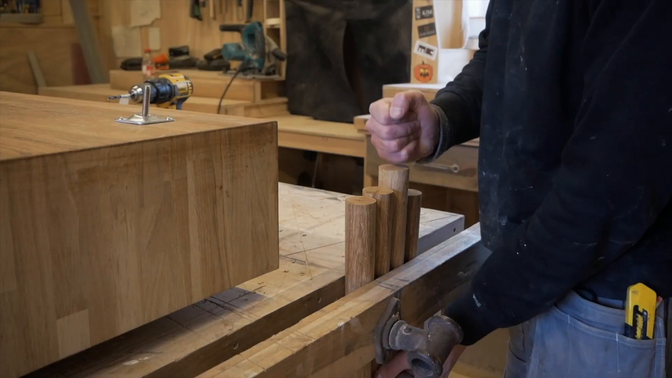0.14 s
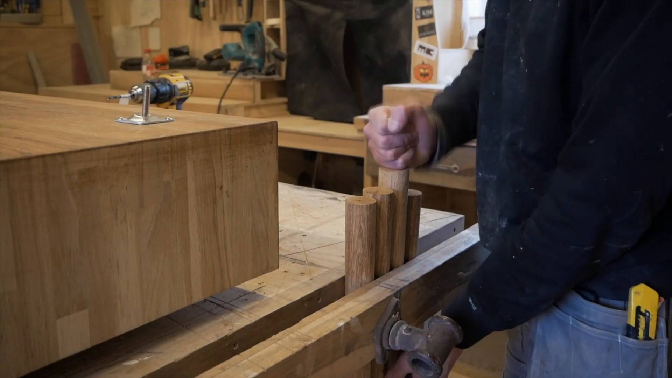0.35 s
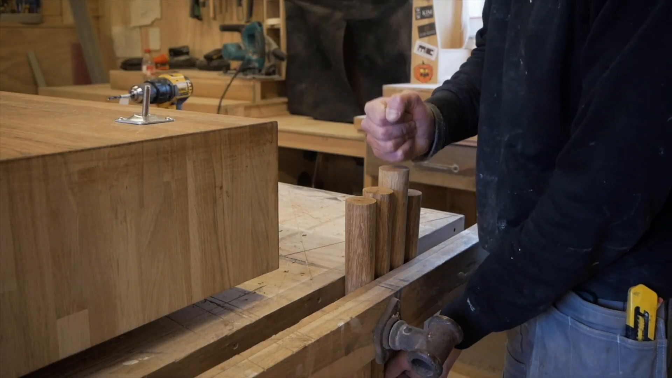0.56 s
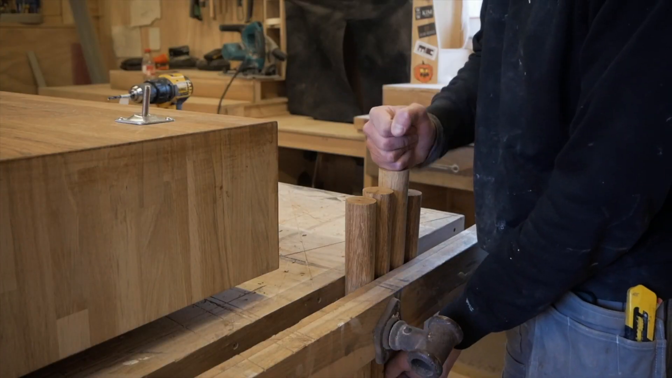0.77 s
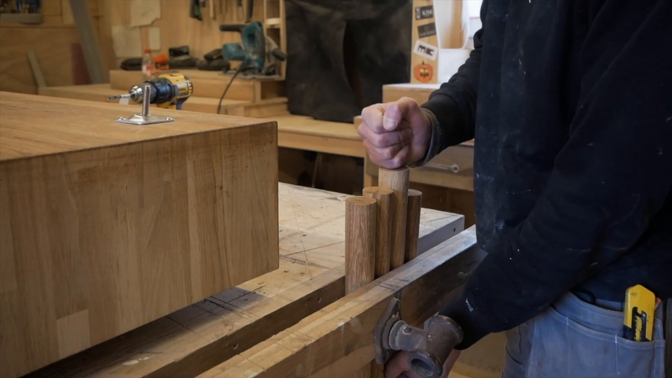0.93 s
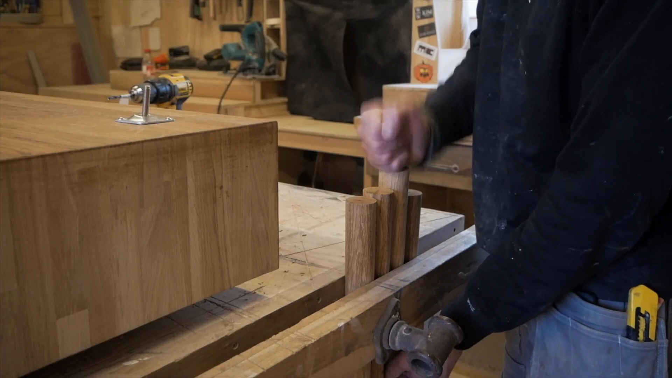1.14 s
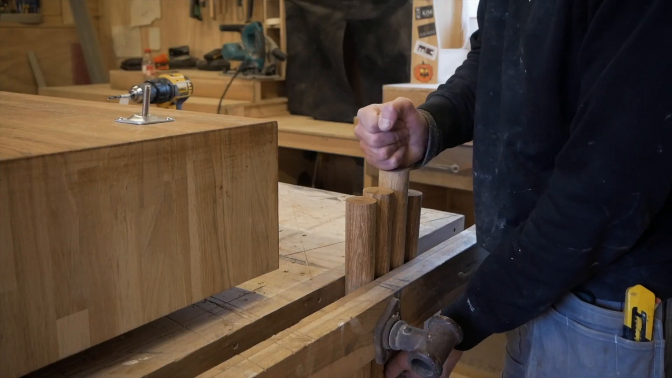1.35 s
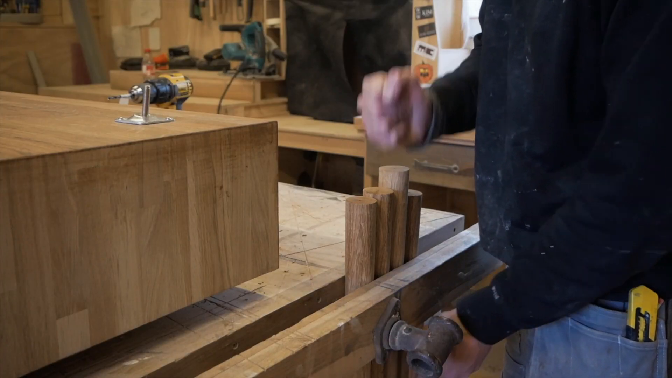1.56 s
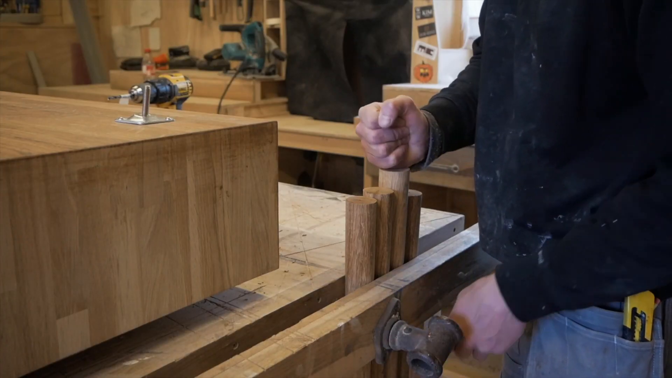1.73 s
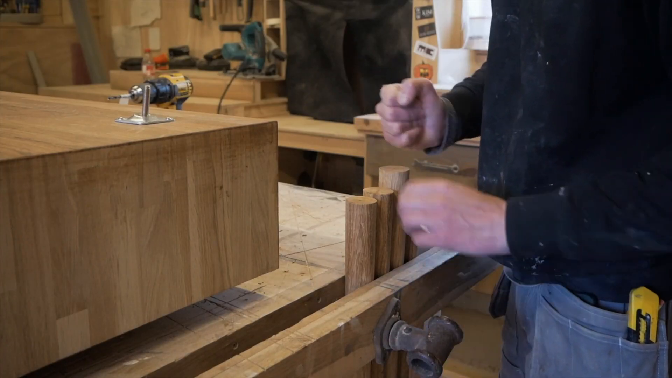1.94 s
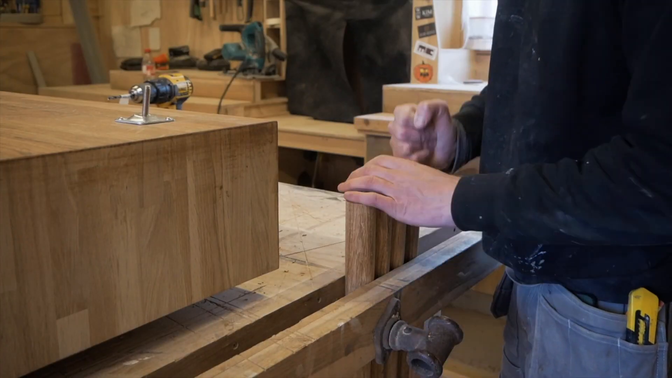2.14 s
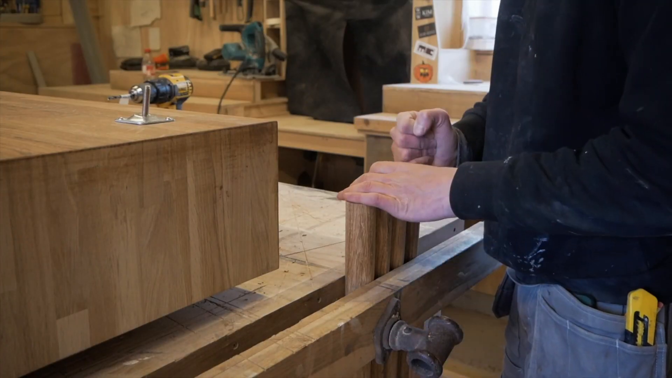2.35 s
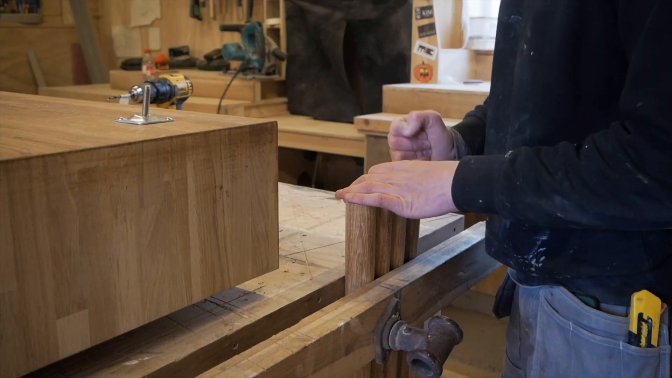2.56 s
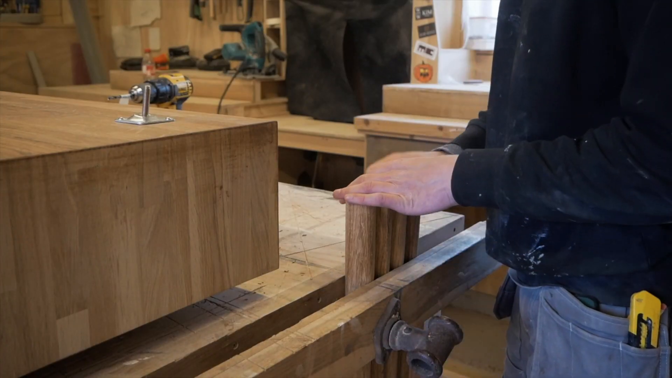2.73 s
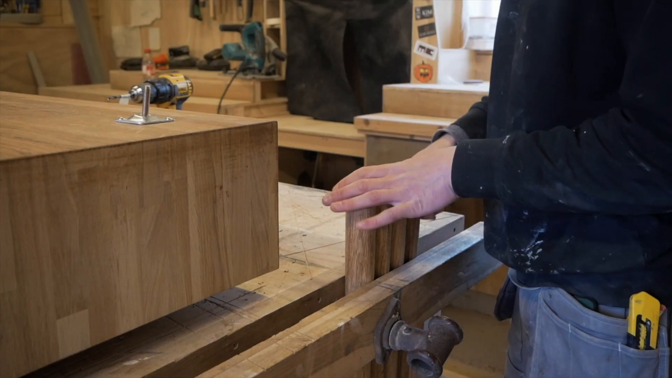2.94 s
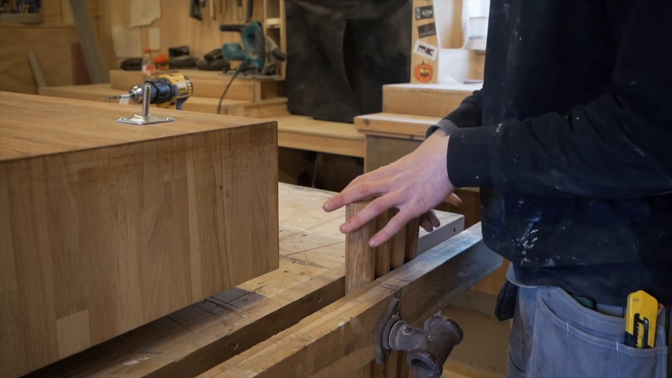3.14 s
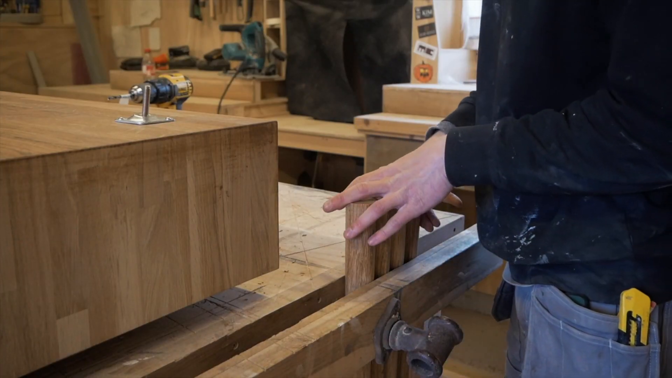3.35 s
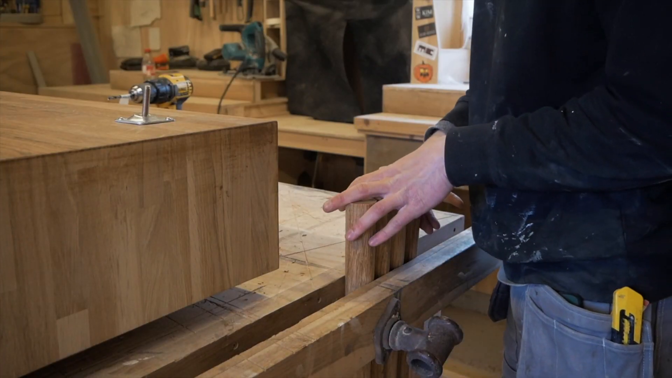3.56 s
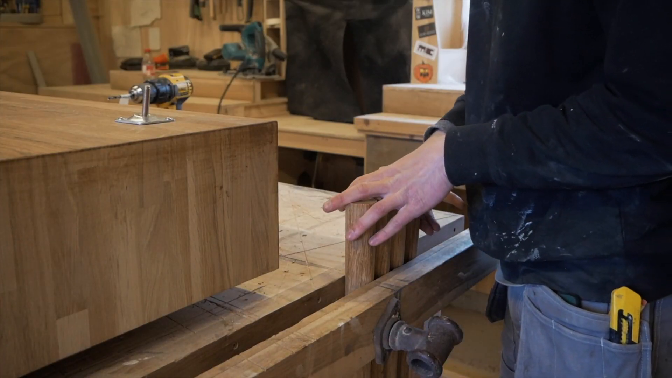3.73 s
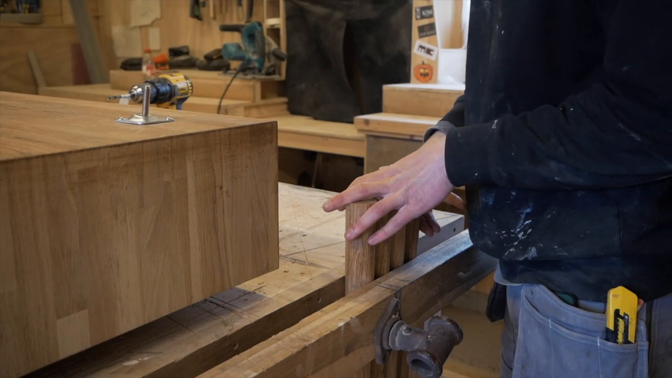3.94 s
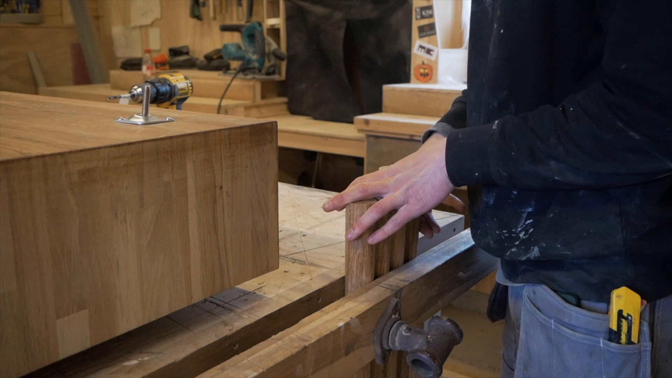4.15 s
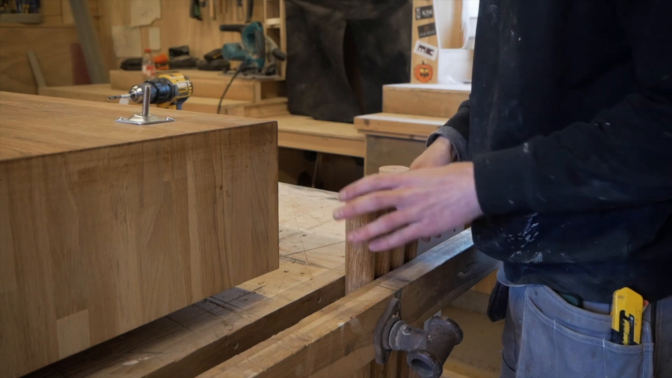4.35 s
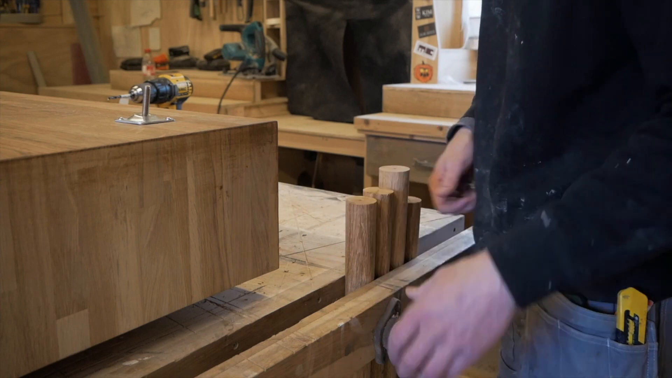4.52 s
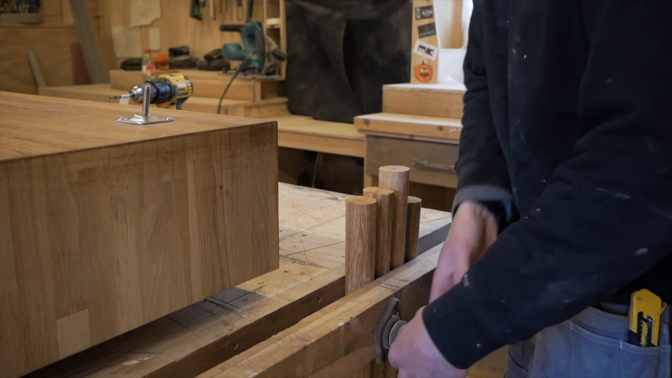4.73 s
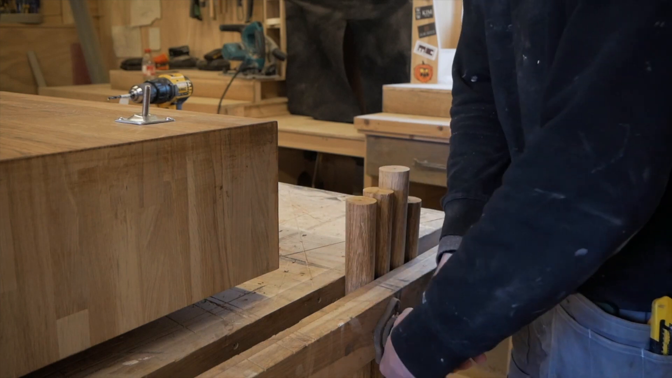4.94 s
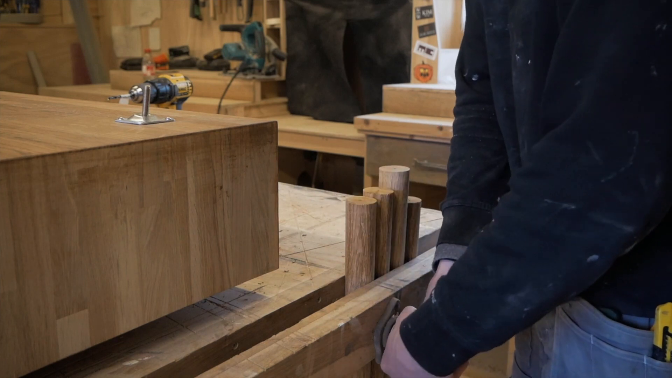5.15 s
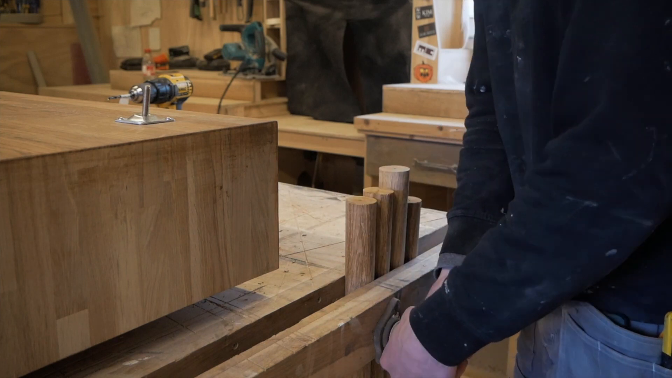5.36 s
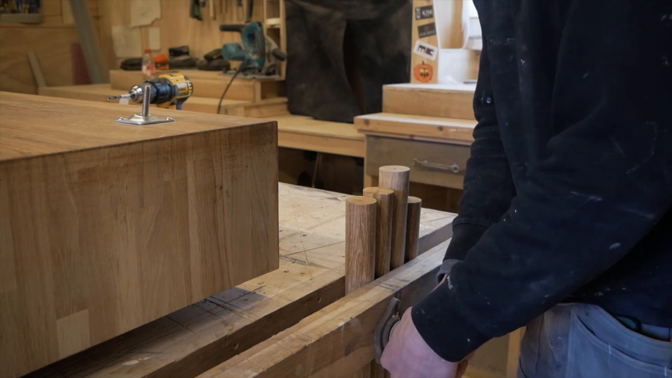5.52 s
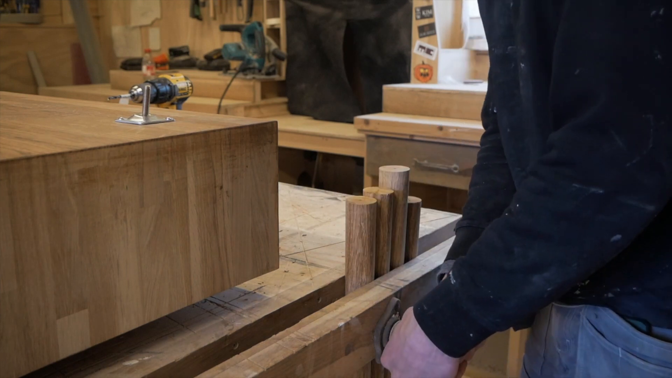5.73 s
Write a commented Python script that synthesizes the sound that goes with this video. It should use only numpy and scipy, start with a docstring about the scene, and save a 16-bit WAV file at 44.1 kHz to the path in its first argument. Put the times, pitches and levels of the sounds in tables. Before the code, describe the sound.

Five heavy, evenly spaced thumps on wood in a workshop, then two sharper knocks, light wooden taps and faint sleeve rustle.

```python
"""A workbench rings as a fist thumps on the tallest of some short wooden dowels clamped in its vise.
The fist drives the dowel down, then two knocks and a few light taps follow. Each impact thumps the bench,
excites the modes of the wood and lets it slip a little between the jaws; bench and workshop ring on.
In the pauses, faint friction: sleeves rustle, a hand settles on the dowels, the vise handle is worked."""
import sys
import numpy as np
from scipy import signal
from scipy.fft import rfft, irfft
from scipy.io import wavfile

SR = 44100
rng = np.random.default_rng(int(sys.argv[2]) if len(sys.argv) > 2 else 0)


def output_pcm(signal):
    """Save a mono or channel-first signal as 16-bit PCM at the path in sys.argv[1].

    Samples are clipped to [-1, 1] before scaling.
    """
    pcm = np.clip(np.atleast_2d(signal).T, -1, 1) * 32767
    wavfile.write(sys.argv[1], SR, np.round(pcm).astype(np.int16))


N = 255206
LEAD_IN = SR // 2   # samples before time zero, so an earlier blow can ring into the opening


def from_db(db):
    """Amplitude ratio for a level in decibels."""
    return 10 ** (np.asarray(db) / 20)


def at_hz(points, hz, column=1):
    """One column of a table, interpolated along log frequency."""
    table = np.array(points)
    return np.interp(np.log(np.maximum(hz, 1)), np.log(table[:, 0]), table[:, column])


def cut(x, hz, kind, order=2):
    """Butterworth filter."""
    return signal.sosfilt(signal.butter(order, hz, kind, fs=SR, output="sos"), x)


def resonance(x, hz, width_hz):
    """Damped oscillator: a two-pole resonance with unit gain at its peak."""
    radius = np.exp(-np.pi * width_hz / SR)
    feedforward = np.array([1, 0, -1]) * (1 - radius ** 2) / 2
    feedback = [1, -2 * radius * np.cos(2 * np.pi * hz / SR), radius ** 2]
    return signal.lfilter(feedforward, feedback, x + 1e-18)


def noise(spectrum):
    """Spectral shaping: white noise is coloured, then scaled to unit rms."""
    gain = from_db(at_hz(spectrum, np.fft.rfftfreq(N, 1 / SR)))
    coloured = irfft(rfft(rng.standard_normal(N)) * gain, N)
    return coloured / np.std(coloured)


def add(track, start_s, sound):
    """Superposition: a sound adds to the track from its start time."""
    start = LEAD_IN + round(start_s * SR)
    track[start:start + len(sound)] += sound[:len(track) - start]


# Still air of the room. Each row: frequency in Hz, relative spectral level in dB.
AIR_SPECTRUM = [(20, -23.5), (35, -8), (49, 4), (64, -18), (90, -14.5), (135, -16), (200, -15), (350, -17),
                (800, -19.5), (1600, -25.5), (3500, -31.5), (6000, -39.5), (13000, -40.5), (16000, -50)]

def room_air(level_db=-64):
    """Ambient noise: a steady floor, strongest in the bass."""
    return from_db(level_db) * noise(AIR_SPECTRUM)


# Diffuse field. Each row: frequency in Hz, level against the direct sound in dB, T60 in seconds.
ROOM_BANDS = [(50.5, -9, 0.26), (128.4, 9, .62), (252, 11.5, 0.48), (500, 9, 0.78), (992, 1, 0.66),
              (1810, 1.5, 0.65), (3600, -4.5, 0.56), (5895, -4, 0.49), (9830, -8, 0.33), (14860, -11, 0.24)]

def workshop(x, build_s=0.002, first_echo_s=0.003, early_db=-3, early_s=0.012):
    """Reverberation: reflections build up, strongest from the nearest walls, and decay band by band."""
    t, hz = np.arange(SR) / SR, np.fft.rfftfreq(SR, 1 / SR)
    white, tail = rfft(rng.standard_normal(SR)), np.zeros(SR)
    build = 1 - np.exp(-np.maximum(t - first_echo_s, 0) / build_s)
    early_lift = 1 + from_db(early_db) * np.exp(-t / early_s)
    edges = np.geomspace(230, 17000, 56) - 200
    for low, high in zip(edges, edges[1:]):
        centre = (low + high) / 2
        decay = from_db(-60 * t / at_hz(ROOM_BANDS, centre, column=2))
        band = irfft(white * ((hz >= low) & (hz < high)), SR) * build * early_lift * decay
        gain = np.sqrt(2 * (high - low) / SR) * from_db(at_hz(ROOM_BANDS, centre))
        tail += gain * band / np.linalg.norm(band)
    return signal.fftconvolve(x, tail)[:len(x)]


def rubbing(moves, spectrum, attack_s, release_s, flutter_db, catch_hz=90, grip_hz=18):
    """Sliding friction: noise swells, holds and fades; quick catches ride on slower changes of grip."""
    t, envelope = np.arange(N) / SR, np.zeros(N)
    for start, length, db in moves:
        before, after = np.minimum(t - start, 0), np.maximum(t - start - length, 0)
        envelope += from_db(db) * np.exp(before / attack_s - after / release_s)
    flutter = sum(np.interp(t * hz, np.arange(N), rng.standard_normal(N)) for hz in (catch_hz, grip_hz))
    return noise(spectrum) * envelope * from_db(flutter_db * flutter)


# Turns of the vise handle. Each row: start in seconds, length in seconds, level in dB.
SCREW_TURNS = [(4.90, 0.032, -66), (5.25, 0.4, -62.5)]
# Sound of the screw. Each row: frequency in Hz, relative spectral level in dB.
SCREW_SPECTRUM = [(50, -34), (90, -14.5), (135, 6.5), (200, -5), (300, 7), (480, -6), (820, 1.5),
                  (1500, -10.5), (3200, -13), (5500, -27), (14000, -43)]

def vise_screw():
    """Friction of the turning screw makes a faint, low scrape."""
    return rubbing(SCREW_TURNS, SCREW_SPECTRUM, attack_s=0.075, release_s=0.14, flutter_db=2.2)


# Arm movements. Each row: start in seconds, length in seconds, level in dB.
ARM_MOVES = [(2.77, 0.29, -60.5), (3.17, 0.021, -60), (4.42, 0.39, -59.5), (4.90, 0.12, -63.5),
             (5.18, 0.028, -68)]
# Sound of the cloth. Each row: frequency in Hz, relative spectral level in dB.
CLOTH_SPECTRUM = [(50, -22), (140, 3), (300, 14), (1000, 9.5), (2200, -1), (3000, -1), (3800, -4),
                  (7000, -18), (13000, -17), (16000, -22)]

def sleeves():
    """Friction of cloth radiates a soft rustle with each arm movement."""
    return rubbing(ARM_MOVES, CLOTH_SPECTRUM, attack_s=0.023, release_s=0.051, flutter_db=1.0)


# A hand settling on the dowels. The row: start in seconds, length in seconds, level in dB.
HAND_TOUCH = [(3.135, 0.039, -43.5)]
# Sound of the touch. Each row: frequency in Hz, relative spectral level in dB.
HAND_SPECTRUM = [(50, -17), (115, -4.5), (138, 10), (160, -13), (200, -9.5), (330, -11.5), (600, -25),
                 (3000, -48.5), (12000, -70)]

def settling_hand(room_db=-12.5):
    """Soft contact excites mostly low frequencies, followed by a little reverberation."""
    touch = rubbing(HAND_TOUCH, HAND_SPECTRUM, attack_s=0.016, release_s=0.01, flutter_db=2.5)
    return touch + from_db(room_db) * workshop(touch)


# Echoes off the bench top and nearby timber. Each row: delay in seconds, gain in dB.
REFLECTIONS = [(.0023, -12), (.0052, -6.5), (0.0126, -14.5)]

def near_echoes(x, low_hz=500, high_hz=4600):
    """Early reflection: small surfaces close by return the middle of the spectrum."""
    middle = cut(cut(x, low_hz, "high"), high_hz, "low")
    n = np.arange(len(x))
    return sum(from_db(db) * np.interp(n - delay * SR, n, middle, left=0) for delay, db in REFLECTIONS)


# Modes of bench and vise. Each row: frequency in Hz, peak gain in dB, T60 in seconds.
BENCH_MODES = [(55, 9.5, 0.44), (73.6, 11, 0.81), (139, 19.5, .55), (137, 2, 0.43), (164, -1.5, 0.61),
               (191, 1, 0.62), (234.6, 3.5, 0.54), (268.7, 16, 0.9), (337.6, 12, 0.69), (390.7, 18, 0.5),
               (433, 7, 0.82), (551, 7.5, 0.84), (670, 6, 0.093), (774, 9, 0.33), (903.6, 8.5, 0.17),
               (1028, 2.5, 1), (1255, 7.5, 0.4), (1295, 4.5, .55), (1670, 8.5, 0.27), (2729, 2.5, 0.28),
               (3350, 3.5, 0.14)]

def bench(x):
    """Free vibration: the lightly damped modes of bench and vise ring on after every blow."""
    return sum(from_db(db) * resonance(x, hz, np.log(1000) / np.pi / t60) for hz, db, t60 in BENCH_MODES)


# Wood slipping between the jaws. Each row: frequency in Hz, relative spectral level in dB.
SLIP_SPECTRUM = [(300, -4.5), (1000, 2), (1700, -2.5), (2750, 6.5), (3600, 3), (4300, -5), (6000, -8.5),
                 (7500, -14), (10500, -10.5), (15000, -20)]

def rasp(t, slip_s):
    """Stick-slip friction: a short run of random catches, spectrally flattened, coloured by the wood."""
    stroke = t / slip_s * np.exp(-(t / slip_s) ** 2)   # the slide speeds up and sticks again
    catches = rfft(rng.standard_normal(len(t)) * stroke)
    flattened = catches / (np.abs(catches) + np.abs(catches).mean() / 10)
    colour = from_db(at_hz(SLIP_SPECTRUM, np.fft.rfftfreq(len(t), 1 / SR)))
    return irfft(flattened * colour, len(t)) * (t < t[-1] / 2)


def blows(rows, modes, thump_low_hz=53.8, thump_high_hz=233):
    """Impact excitation: each blow gives a soft thump, a rasp of slip and the modal knock of the wood."""
    track, t = np.zeros(LEAD_IN + N), np.arange(SR // 10) / SR
    impulse = signal.unit_impulse(len(t))
    thump = cut(cut(impulse, thump_low_hz, "high"), thump_high_hz, "low", order=4)
    for start, knock_db, contact_hz, pitch, thump_db, slip_db, slip_s in rows:
        contact = cut(impulse, contact_hz, "low")   # a softer contact is duller
        knock = np.zeros(len(t))
        for k, (hz, width, db) in enumerate(modes):
            # two stages in series: the mode swells for a cycle or two and has steep flanks
            ring = resonance(resonance(contact, pitch * hz, width), pitch * hz, width)
            knock += (-1) ** k * from_db(db) * ring
        add(track, start - slip_s, from_db(thump_db) * thump)   # pressure builds before the dowel gives
        add(track, start - slip_s / 2, from_db(slip_db) * rasp(t, slip_s))
        add(track, start, from_db(knock_db) * knock)
    return track


# Light taps. Each row: start in seconds, knock level in dB, contact cutoff in Hz, slip level in dB.
LIGHT_TAPS = [(3.303, -4, 2060, -29.6), (3.516, 2, 3750, -11.5), (3.834, 4, 3720, -10),
              (4.1254, 9, 3840, -7)]
# Modes of the tapped wood. Each row: base frequency in Hz, stage bandwidth in Hz, gain in dB.
TAP_MODES = [(189.6, 39, 0.5), (379, 117, -2.5), (680, 270, -8), (1043, 330, 4), (1344, 106, 4),
             (1557, 300, -2.5), (2164, 160, -9.5), (2735, 114, -2), (3890, 190, -3)]

def taps(pitch=0.96, slip_s=0.001984, thump_offset_db=-6.5):
    """Linear response: each tap is firmer than the last, and the thump grows in proportion."""
    rows = [(start, db, hz, pitch, db + thump_offset_db, slip_db, slip_s)
            for start, db, hz, slip_db in LIGHT_TAPS]
    return blows(rows, TAP_MODES)


# Knocks on the dowel tops, two contacts apiece. Each row: start in seconds, knock level in dB,
# contact cutoff in Hz, thump level in dB, slip level in dB.
HARD_KNOCKS = [(2.258, -0.5, 2970, -9, -17), (2.273, 23, 1930, 2, -25), (2.4874, 22, 1220, -1.5, -21),
               (2.5097, 12.5, 1060, 1.5, -44)]
# Modes of the knocked wood. Each row: base frequency in Hz, stage bandwidth in Hz, gain in dB.
KNOCK_MODES = [(434, 62, -3.5), (563, 110, -12.5), (737, 175, -8), (973, 228, 1), (1316, 113, -0.7),
               (1560, 150, -14.5), (1892, 300, -10.5), (2710, 419, -14.5), (3760, 680, -15.5)]

def knocks(pitch=0.947, slip_s=0.00299):
    """Hard impacts excite the modes of the wood but barely move the dowels."""
    rows = [(start, db, hz, pitch, thump_db, slip_db, slip_s)
            for start, db, hz, thump_db, slip_db in HARD_KNOCKS]
    return blows(rows, KNOCK_MODES)


# Blows of the fist. Each row: start in seconds, knock level in dB, contact cutoff in Hz, pitch as a
# ratio, thump level in dB, slip level in dB, slip time in seconds.
FIST_BLOWS = [(-0.260, 18, 2400, 1.01, 23, -7.5, 0.01), (0.0455, 7.5, 3700, 0.61, -2, -5, 0.0031),
              (0.053, 8.5, 2020, 0.88, 0, -17, 0.0052), (0.059, 13.5, 2050, 1, 7, -25, 0.005),
              (0.4045, 8, 2000, 1.1, 0.5, -4.5, 0.0027), (0.408, 27.5, 2700, 1.074, 9.5, 4, .002),
              (0.4265, 17.5, 450, 0.91, 10, -18, 0.0037), (0.7963, 19.5, 3160, 1.01, 16.5, 7, 0.00502),
              (1.2022, 21.5, 1900, 1.01, 22, 7.5, 0.005), (1.640, 20, 1210, 1.048, 20, 2, 0.0041)]
# Modes of the wood under the fist. Each row: base frequency in Hz, stage bandwidth in Hz, gain in dB.
FIST_MODES = [(178, 55, -16.5), (342.2, 110, -1.5), (462, 206, -8), (780, 224, 0), (995, 140, 0.5),
              (1156, 250, -3.5), (1544, 400, -11), (2120, 600, -18.5), (2500, 540, -14.5),
              (3130, 350, -20.5), (3470, 490, -13)]

def fist():
    """Heavy impacts overcome static friction and drive the tall dowel down between the jaws."""
    return blows(FIST_BLOWS, FIST_MODES)


def scene(lag_s=2.4e-6):
    """Superposition of blows, their ringing and quiet handling at two nearly coincident microphones."""
    struck = fist() + knocks() + taps()
    ringing = struck + near_echoes(struck) + bench(struck) + workshop(struck)
    mid = ringing[LEAD_IN:] + settling_hand() + sleeves() + vise_screw() + room_air()
    side = np.gradient(mid) * SR * lag_s / 2   # the sound reaches one microphone lag_s sooner
    return np.array([mid + side, mid - side])


def record(dry, hiss_db=-92, cutoff_hz=15400):
    """Self-noise and band limiting: each channel adds its own faint hiss before a steep low-pass."""
    hissy = dry + from_db(hiss_db) * rng.standard_normal(dry.shape)
    return signal.sosfilt(signal.ellip(10, 0.1, 80, cutoff_hz, fs=SR, output="sos"), hissy)


dry = scene()
out = record(dry)
output_pcm(out)
```